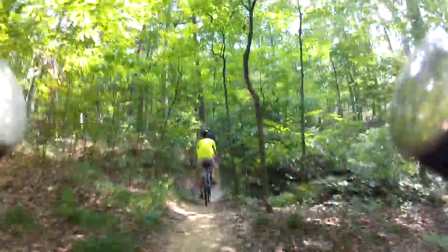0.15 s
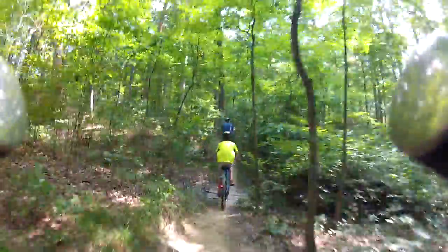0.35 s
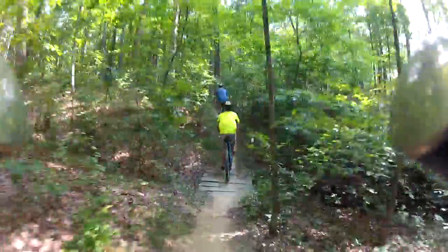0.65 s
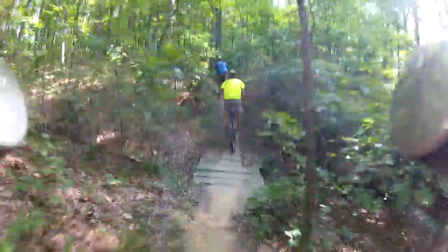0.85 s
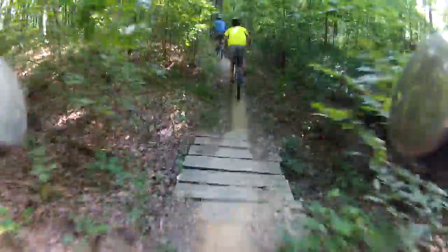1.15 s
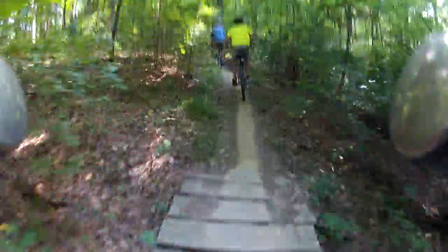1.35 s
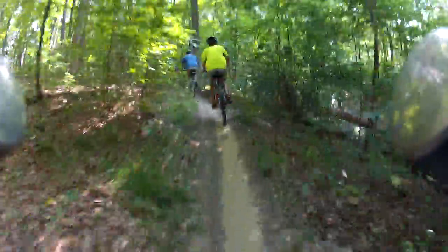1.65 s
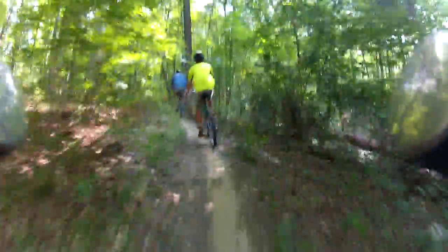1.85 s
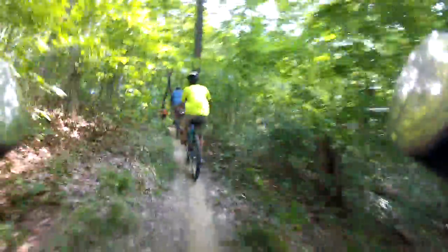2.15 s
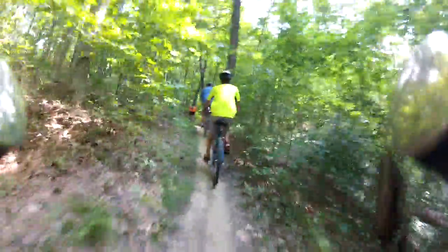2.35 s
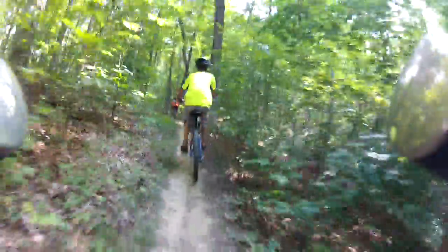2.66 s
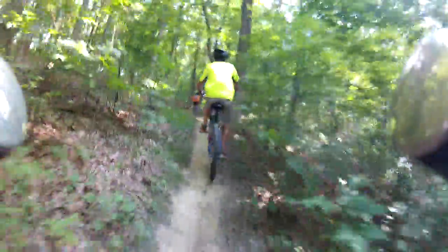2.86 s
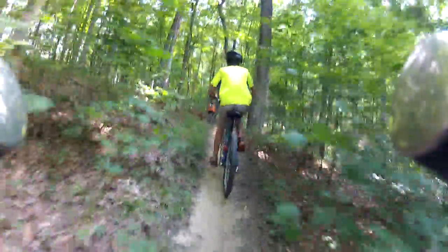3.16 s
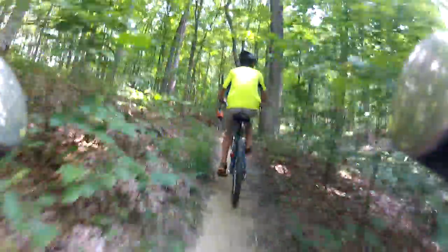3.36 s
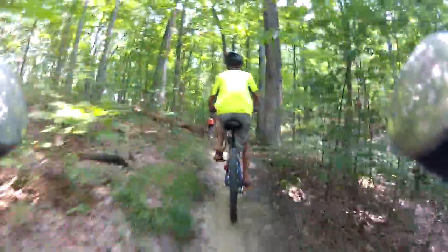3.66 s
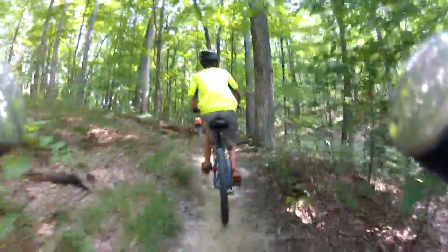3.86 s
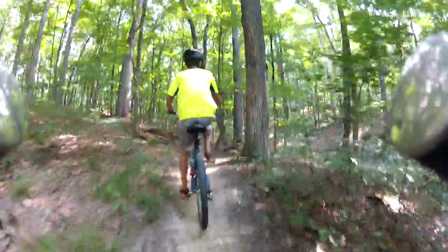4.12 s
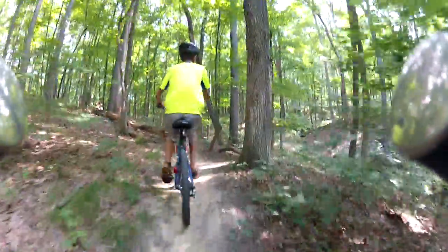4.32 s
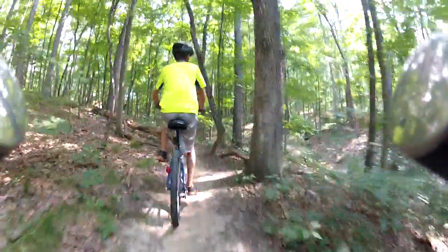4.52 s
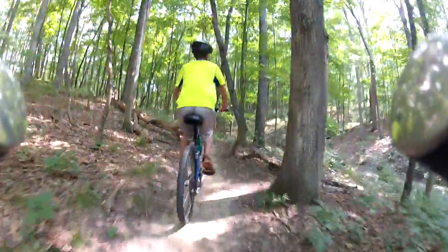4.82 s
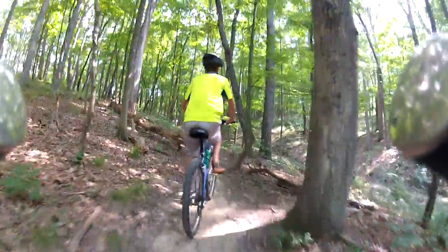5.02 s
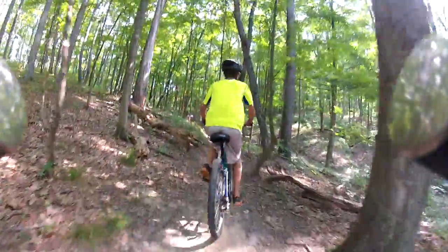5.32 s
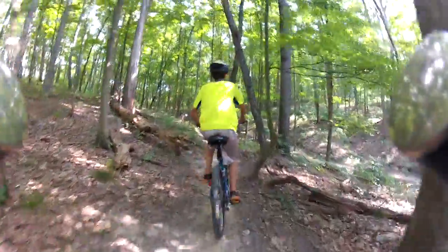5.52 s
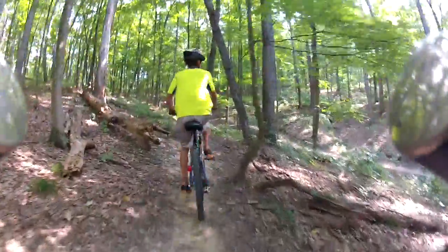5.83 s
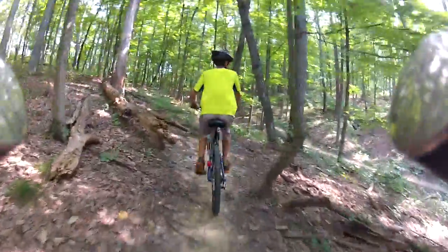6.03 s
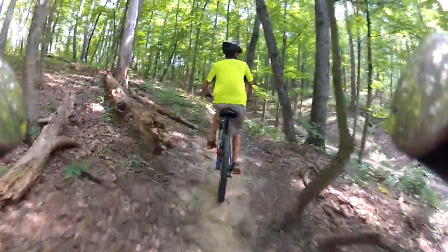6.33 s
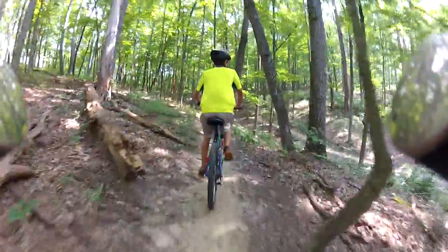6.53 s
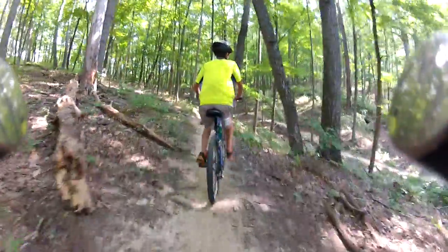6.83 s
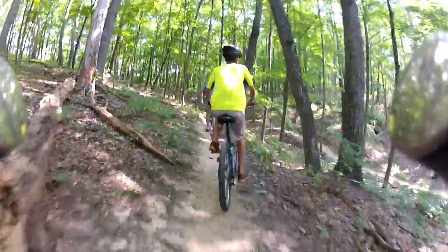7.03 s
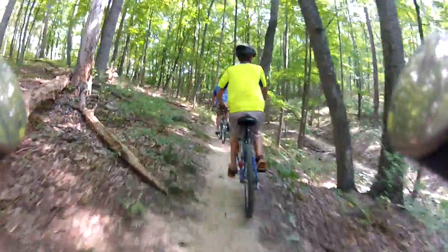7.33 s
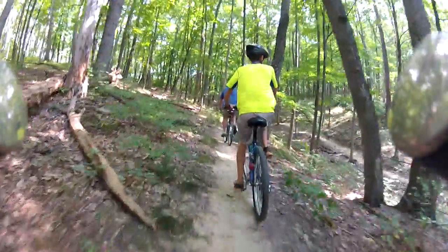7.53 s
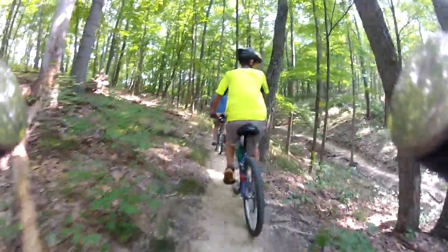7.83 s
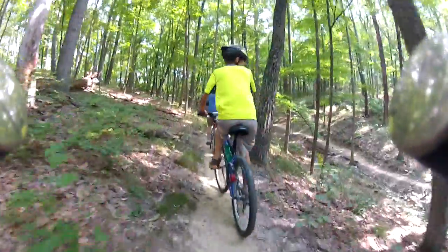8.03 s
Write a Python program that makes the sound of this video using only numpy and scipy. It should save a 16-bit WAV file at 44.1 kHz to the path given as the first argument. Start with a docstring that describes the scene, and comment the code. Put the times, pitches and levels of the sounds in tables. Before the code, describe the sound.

Heard close through a camera's plastic case, a mountain bike rattles along a woodland dirt track. A boxy, hollow resonance runs throughout with low humming, rumbling tyres and a buzz of loose parts. After a short run of freewheel ticks come the hardest knocks, with frame clacks and crunching grit. Roots and stones keep knocking as the rumble eases, metal chirps now and then, and the highs have a faint glassy sheen.

```python
"""A mountain bike rolls along a dirt trail, heard from a cased camera that rides on it.
The mount swings at a low pitch and drives loose parts to buzz in time with it. The tyres rumble
and crush grit; bumps excite the hollow resonance of the case and the clattering modes of the frame.
Early on the freewheel ticks, and now and then metal chirps. The camera's limiter ducks after
the hardest knocks, and its coarse sampling adds spectral images, heard as a glassy sheen."""
import sys
import numpy as np
from scipy import signal
from scipy.fft import rfft, irfft
from scipy.io import wavfile
from scipy.ndimage import uniform_filter1d, minimum_filter1d

SR = 44100
rng = np.random.default_rng(int(sys.argv[2]) if len(sys.argv) > 2 else 0)


def wav_record(signal):
    """Record a signal, one row per channel, as 16-bit PCM in the file named by sys.argv[1]."""
    frames = np.transpose(np.atleast_2d(signal))
    bounded = np.clip(frames, -1, 1)
    # unit amplitude maps onto the largest positive 16-bit level
    quanta = np.round(bounded * 32767).astype(np.int16)
    wavfile.write(sys.argv[1], SR, quanta)


N = 360738
TIME = np.arange(N) / SR


def from_db(db):
    """Amplitude ratio of a level in decibels."""
    return 10 ** (np.asarray(db) / 20)


def rms_one(x):
    """Normalisation to unit power."""
    return x / np.sqrt(np.mean(x ** 2) + 1e-20)


def evened(x, size):
    """Normalisation to unit power over a moving window of `size` samples; faster detail stays."""
    power = np.maximum(uniform_filter1d(x ** 2, size), 0)
    return x / np.sqrt(power + 1e-4 * np.mean(x ** 2))


def curve(rows):
    """Linear interpolation of (time, value) rows at every sample."""
    return np.interp(TIME, *np.transpose(rows))


def drift(rate):
    """Random modulation of unit power, with `rate` new values a second."""
    return rms_one(np.interp(TIME * rate, np.arange(20000), rng.standard_normal(20000)))


def impulses(seconds, heights):
    """Ideal impacts, one sample long, at the given times."""
    out = np.zeros(N)
    np.add.at(out, np.clip(np.round(np.asarray(seconds) * SR).astype(int), 0, N - 1), heights)
    return out


def grains(per_s, spread_db):
    """A Poisson process: independent contacts of random sign and strength."""
    contacts = (rng.random(N) < per_s / SR) * rng.choice([-1, 1], N)
    return contacts * from_db(spread_db * np.clip(rng.standard_normal(N), -2, 2))


def resonate(x, hz, width_hz):
    """A damped oscillator with unit gain at resonance."""
    r = np.exp(-np.pi * width_hz / SR)
    feedback = [1, -2 * r * np.cos(2 * np.pi * hz / SR), r * r]
    return signal.lfilter(np.array([1, 0, -1]) * (1 - r * r) / 2, feedback, x + 1e-18)


def body(x, modes):
    """Modal superposition: resonances in parallel, with alternating signs."""
    return sum((-1) ** k * from_db(db) * resonate(x, hz, width)
               for k, (hz, width, db) in enumerate(modes))


def band(x, low_hz, high_hz, order):
    """Maximally flat band-pass filter."""
    sos = signal.butter(order, [low_hz, high_hz], "band", fs=SR, output="sos")
    return signal.sosfilt(sos, x + 1e-18)


def bursts(events, rise_s, colour):
    """Dense contacts merge into noise: each (time, level) event swells in `rise_s` and decays."""
    s, db = np.transpose(events)
    age = np.arange(4000) / SR / rise_s
    swell = signal.oaconvolve(impulses(s, from_db(db)), (age * np.exp(1 - age)) ** 2)[:N]
    return swell * evened(colour(rng.standard_normal(N)), size=int(3 * rise_s * SR) + 1)


# strength of the mount's swing: (time [s], level [dB])
SWING_LEVEL = [(0.0, -21), (0.75, -27.5), (1.0, -19.5), (1.45, -27.5), (1.9, -20.5), (2.0, -33),
               (2.14, -23), (2.29, -32.5), (3.24, -22.5), (3.79, -31), (3.99, -22), (4.34, -26.5),
               (4.74, -21), (5.54, -33), (5.69, -16.5), (5.84, -34.5), (6.48, -32.6), (6.58, -29.5),
               (7.53, -24), (7.68, -37), (7.98, -21), (8.18, -32)]
# pitch of that swing: (time [s], frequency [Hz])
SWING_PITCH = [(0.0, 53.03), (0.8, 57.42), (0.89, 51.56), (1.41, 60), (1.57, 52.94), (2.41, 54),
               (2.57, 59.9), (2.96, 53.56), (3.89, 50), (4.12, 54.5), (5.49, 53.76), (5.92, 60.56),
               (6.58, 51.6), (8.18, 57.2)]
def mount_wobble():
    """Anharmonic oscillation of the jolted mount; gives sound, phase and dB above the mean swing."""
    swing_db = curve(SWING_LEVEL)
    phase = 2 * np.pi * np.cumsum(curve(SWING_PITCH) + 0.5 * drift(rate=19)) / SR
    jolts = evened(1 + 0.51 * np.minimum(drift(rate=17), 0.7), size=13000)   # feed or nearly stop it
    lopsided = np.sin(phase) + from_db(-22.5) * np.sin(2 * phase) + from_db(-25) * np.sin(3 * phase)
    swing = np.sqrt(2) * from_db(swing_db + 2.5) * jolts * lopsided
    return swing, phase, swing_db - swing_db.mean()


# spectrum of the tyre rumble: (frequency [Hz], relative spectral density [dB])
RUMBLE_SPECTRUM = [(18, 20), (30, 7), (42, 6), (70, 8.5), (95, 0), (116, 4), (142, -0.5), (172, 0.5),
                   (210, -7), (270, -8), (450, -5.5), (1500, -89)]
# strength of the rumble: (time [s], level [dB])
RUMBLE_LEVEL = [(0.0, -31), (1.95, -29.5), (2.09, -36), (3.29, -32), (3.69, -36), (6.38, -39),
                (6.58, -35.5), (8.18, -36)]
def tyre_rumble():
    """Random excitation: tyres rolling on packed dirt radiate lumpy low-frequency noise."""
    hz, db = np.transpose(RUMBLE_SPECTRUM)
    bin_hz = np.arange(N // 2 + 1) * SR / N
    colour = from_db(np.interp(np.log(bin_hz + 1), np.log(hz), db))
    noise = irfft(rfft(rng.standard_normal(N)) * colour, N)
    return from_db(curve(RUMBLE_LEVEL) + 6) * evened(band(noise, 28.7, 1400, order=2), size=11000)


# roughness of the ground, as the noise it stirs up: (time [s], level [dB])
GROUND_ROUGHNESS = [(0.0, -28.5), (1.1, -42), (1.55, -24.5), (1.9, -33.5), (2.0, -28.5), (2.24, -38.5),
                    (2.79, -32), (2.94, -34), (3.59, -29), (3.74, -38.5), (4.59, -39.5), (4.74, -35.5),
                    (5.89, -44), (6.09, -36.5), (6.28, -39.5), (6.43, -43), (7.63, -37.5), (8.18, -41.5)]
def roughness():
    """Surface roughness sets the excitation: dB above its mean, varying from lump to lump."""
    ground_db = curve(GROUND_ROUGHNESS)
    return ground_db - ground_db.mean() + 3 * np.clip(drift(rate=60), -2, 2)


# hollow resonances of the case: (frequency [Hz], bandwidth [Hz])
CASE_MODES = [(606, 38.4), (668, 47.6)]
def case(x, damping):
    """Resonators in series: one drives the other, and damping widens both."""
    for hz, width in CASE_MODES:
        x = resonate(x, hz, width * damping)
    return x


# modes of frame and bars: (frequency [Hz], bandwidth [Hz], gain [dB])
FRAME_MODES = [(308.6, 35.6, 4), (392, 29.7, 6.5), (452, 120, -1.5), (687.4, 26.4, 5), (945, 91, -2.5),
               (1021, 41, -1), (1110, 68, 2.5)]
def frame(x):
    """Modal response of frame and bars, a dull clatter."""
    return band(body(x, FRAME_MODES), 345.6, 1054, order=5)


# strength of the case's hollow ring: (time [s], level [dB])
RING_LEVEL = [(0.0, -19.5), (1.15, -22), (1.4, -14.5), (1.5, -18), (1.95, -16), (2.29, -18), (2.59, -17.5),
              (5.34, -18.5), (5.49, -17), (5.69, -22.8), (5.84, -17.5), (8.18, -17.5)]
def trail_bumps(rough_db):
    """Forced vibration: countless small bumps keep the case and the frame ringing."""
    hollow = evened(case(grains(per_s=420, spread_db=2), damping=1), size=1800)
    hollow *= from_db(curve(RING_LEVEL) + 2.2 * drift(rate=14) + 0.15 * rough_db - 0.7)
    bumps = grains(per_s=600, spread_db=4.5) * from_db(1.2 * np.tanh(drift(rate=45)))
    clatter = from_db(-31 + 0.74 * rough_db) * evened(frame(bumps), size=4400)
    return tyre_contact() * (hollow + clatter)


# modes of the loose plastic parts: (frequency [Hz], bandwidth [Hz], gain [dB])
PLASTIC_MODES = [(2450, 800, -6), (3320, 840, 0.5), (3910, 770, -0.5), (5350, 180, -2)]
def plastic(x):
    """Heavily damped high modes give hard plastic a short, bright ring."""
    return band(body(x, PLASTIC_MODES), 750, 7500, order=2)


# hardest snaps of the loose parts: (time [s], level [dB])
PLASTIC_SNAPS = [(0.079, -19.5), (0.138, -15), (0.201, -18.5), (0.592, -17), (0.838, -15.5), (0.997, -21),
                 (1.362, -21), (1.57, -10), (1.608, -14), (1.645, -18.5), (2.589, -18.5), (2.875, -22),
                 (3.398, -20.5), (4.169, -31), (4.725, -19), (4.745, -20), (4.852, -18), (5.956, -23),
                 (6.902, -23), (7.06, -22), (7.319, -21.5)]
def rattle(phase, swing_db, rough_db, jitter_s=0.0014, spread_db=8, lead_db=5.5):
    """Impact oscillation: loose parts hit their stops twice per swing, harder on one side."""
    turns = TIME[1:][np.diff(np.floor(phase / np.pi)) > 0]
    timing, force = rng.standard_normal((1200, 2))[:len(turns)].T
    force_db = spread_db * np.tanh(force) + lead_db * (np.arange(len(turns)) % 2)
    hits = bursts(np.column_stack([turns + jitter_s * timing, force_db]), rise_s=0.0012, colour=plastic)
    # between the stops the parts shuffle about in flurries
    flurries = grains(per_s=1100, spread_db=5.5) * from_db(8.6 * np.tanh(drift(rate=60)))
    shuffle = from_db(-2.5) * rms_one(plastic(flurries))
    level_db = -35.5 + 0.25 * rough_db + 0.55 * swing_db + 2.1 * drift(rate=16)
    snaps = bursts(PLASTIC_SNAPS, rise_s=0.0021, colour=plastic)
    return from_db(level_db) * evened(hits + shuffle, size=4000) + snaps


# resonances excited by grit: (frequency [Hz], bandwidth [Hz], gain [dB])
GRIT_MODES = [(1297, 148, -2.5), (1803, 77, 2.5), (2014, 124, 1.5), (2370, 105, 8), (2446, 286, 1),
              (2740, 83, 6.5), (3113, 114, -3.5), (3820, 250, -3.5)]
def dirt(x):
    """Modal response of the tread on gritty ground."""
    return band(body(x, GRIT_MODES), 1220, 4500, order=3)


# the tread crushes a patch of grit: (time [s], level [dB])
GRIT_CRUNCHES = [(0.16, -25), (1.567, -27), (1.585, -22.5), (1.612, -34), (1.79, -21.5), (1.906, -25.5),
                 (1.985, -24), (2.043, -23), (2.564, -24), (2.678, -22), (3.442, -25.5), (3.607, -35),
                 (4.739, -28), (6.025, -37), (7.959, -28)]
def grit(rough_db, scuff_at_s=6.62, scuff_half_s=0.085):
    """Shot noise: grains crunch in clumps, louder on rough ground and as a tyre scuffs sideways."""
    clumps = from_db(4.6 * np.tanh(drift(rate=90)))
    crunch = evened(dirt(grains(per_s=2500, spread_db=10) * clumps), size=3000)
    scuff_db = 9 * np.exp(-((TIME - scuff_at_s) / scuff_half_s) ** 2)
    level_db = -37 + 0.55 * rough_db + scuff_db + 2 * drift(rate=18)
    patches = bursts(GRIT_CRUNCHES, rise_s=0.0049, colour=dirt)
    return from_db(level_db) * crunch + from_db(2.5) * patches


def small_stones(rough_db, per_s=5):
    """Random arrivals of stones; gives knock times for the case and (time, level) rows for the frame."""
    chance = rng.random((200, 3))
    arrivals = np.cumsum(0.3 + 1.4 * chance[:, :2], axis=0) / per_s
    knock_s, clack_s = (s[s < TIME[-1]] for s in arrivals.T)
    clack_db = -21 + 0.5 * np.interp(clack_s, TIME, rough_db) - 3 * chance[:len(clack_s), 2]
    return knock_s, np.column_stack([clack_s, clack_db])


# big roots, stones and bridge planks knock the case: (time [s], level [dB])
BIG_BUMPS = [(0.026, -6), (0.214, -2.5), (0.848, -6.5), (0.88, -6), (1.353, -3), (1.406, 9), (1.74, -5.5),
             (2.14, 6), (2.485, -6), (2.64, -5.5), (2.827, -6.5), (3.688, -10.5), (3.739, -4),
             (4.046, -7.5), (4.097, -14), (4.205, 1), (4.447, -8.5), (4.514, -2), (4.698, -7), (4.937, -5),
             (5.064, -7), (5.209, -4), (5.38, -9), (5.519, -9), (5.808, -6), (5.912, -6.5), (6.003, -10),
             (6.159, -11), (6.283, -4.5), (6.706, -1), (6.907, -5), (7.679, -9.5), (7.704, -6.5),
             (7.834, -6.0), (8.007, -7.5)]
def case_knocks(stone_s):
    """Impulse response: each big bump or small stone draws a brief, damped knock from the case."""
    s, db = np.transpose(BIG_BUMPS)
    blows = impulses(s - 0.001, from_db(db - 0.3)) + impulses(stone_s, from_db(-11))
    ring = band(case(signal.unit_impulse(6000), damping=1.7), 470, 860, order=2)
    return signal.oaconvolve(blows, ring / np.abs(ring).max())[:N]


def tyre_contact(skip_share=0.26, skip_s=0.0063):
    """Partial loss of contact: on a big bump the tyre skips some of the small ones."""
    bump_s = np.transpose(BIG_BUMPS)[0]
    nearest_s = np.abs(TIME[::20, None] - bump_s).min(axis=1)
    return 1 - skip_share * np.exp(-(np.interp(TIME, TIME[::20], nearest_s) / skip_s) ** 2)


def hard_contact(x):
    """A hard contact excites the upper modes of the frame, with a bright, gritty edge."""
    return rms_one(band(frame(x), 667, 1085, order=2)) + from_db(-11) * rms_one(dirt(x))


# hard blows to the frame: (time [s], level [dB])
FRAME_BLOWS = [(0.22, -18), (0.575, -16), (1.351, -13.5), (1.403, -12), (1.615, -12), (1.739, -10),
               (1.79, -14), (1.86, -13.5), (1.908, -14), (1.966, -14), (1.985, -14), (2.786, -17),
               (3.312, -13), (3.609, -14.5), (4.877, -25), (4.903, -18), (4.93, -17), (5.178, -15.5),
               (6.453, -17.5), (6.482, -22), (7.289, -17.5), (7.323, -17), (7.533, -17.5), (7.641, -18),
               (7.672, -18.5)]
def frame_clacks(stone_blows):
    """Transient excitation: roots and stones make the frame clack, higher than the case."""
    blows = np.vstack([FRAME_BLOWS, stone_blows])
    return from_db(0.45) * bursts(blows, rise_s=0.0041, colour=hard_contact)


def metal_tones(events, rise_s, sag_hz):
    """Damped vibration: touched metal swells and fades, sagging `sag_hz` in each of three rise times."""
    out = np.zeros(N)
    age = np.arange(3000) / SR / rise_s
    swell = (age * np.exp(1 - age)) ** 2
    for s, db, hz in events:
        pitch = hz + sag_hz * (1 - np.minimum(age, 3))
        tone = from_db(db) * swell * np.sin(2 * np.pi * np.cumsum(pitch) / SR)
        start = max(int(s * SR), 0)
        out[start:start + len(age)] += tone[:N - start]
    return out


def freewheel(coast_s=(0.362, 1.29), ticks_per_s=(42.6, 38.2), level_db=-26.5, ring_hz=2830):
    """Nearly periodic impacts: pawls drop at a slowing pace, each with a slightly different ring."""
    rate = np.interp(TIME, coast_s, ticks_per_s, left=0, right=0)
    tick_s = TIME[1:][np.diff(np.ceil(np.cumsum(rate) / SR)) > 0]
    ticks = np.array([(s, level_db, ring_hz) for s in tick_s])
    scatter = rng.standard_normal(ticks.shape) * [0.001, 2, 70]   # s, dB, Hz
    return metal_tones(ticks + scatter, rise_s=0.0036, sag_hz=45)


# touches of metal on the bike: (time [s], level [dB], frequency [Hz])
METAL_TOUCHES = [(1.5671, -10.5, 2730), (2.8569, -13, 2800), (2.8766, -13, 2790), (4.4752, -13.5, 2720),
                 (6.005, -10.5, 2777)]
def metal_chirps():
    """Free vibration of a single mode: each touch of metal gives a short falling chirp."""
    return from_db(-10.5) * metal_tones(METAL_TOUCHES, rise_s=0.0062, sag_hz=22)


def scene():
    """Superposition: every source reaches one microphone through the mount and the case."""
    rough_db = roughness()
    swing, phase, swing_db = mount_wobble()
    rolling = swing + tyre_rumble() + trail_bumps(rough_db)
    stone_s, stone_blows = small_stones(rough_db)
    impacts = case_knocks(stone_s) + frame_clacks(stone_blows)
    metal = freewheel() + metal_chirps()
    mix = rolling + impacts + metal + rattle(phase, swing_db, rough_db) + grit(rough_db)
    return np.tile(mix, (2, 1))


def limiter(x, limit_db=-3, attack_s=0.00094, hold_s=0.066, release_db_per_s=103):
    """Automatic gain control: a peak over the limit cuts the gain, which holds, then climbs back."""
    over_db = np.maximum(20 * np.log10(np.abs(x).max(axis=0) + 1e-9) - limit_db, 0)
    half_hold = int(hold_s * SR) // 2
    held_db = -minimum_filter1d(-over_db, 2 * half_hold + 1, origin=half_hold, mode="constant")
    release_db = release_db_per_s * TIME
    duck_db = np.maximum.accumulate(held_db + release_db) - release_db
    pole = np.exp(-1 / (attack_s * SR))
    return x * from_db(-signal.lfilter([1 - pole], [1, -pole], duck_db))


def sample_and_hold(x, sampling_hz=12000):
    """Spectral imaging: holding each coarse sample mirrors the sound faintly about the sampling rate."""
    band_limited = signal.sosfilt(signal.butter(10, 5850, fs=SR, output="sos"), x)
    mirrored = band_limited * (1 + 2 * np.cos(2 * np.pi * sampling_hz * TIME))
    hz = np.arange(N // 2 + 1) * SR / N
    hold_droop = np.sinc(hz / sampling_hz) / np.sinc(hz / (4 * sampling_hz))
    return irfft(rfft(mirrored) * hold_droop, N)


def record(dry):
    """The camera's signal chain: limiting, coarse sampling, full-scale clipping and a steep low-pass."""
    clipped = np.clip(sample_and_hold(limiter(dry)), -1, 1)
    return signal.sosfilt(signal.ellip(10, 0.1, 80, 15600, fs=SR, output="sos"), clipped)


dry = scene()
out = record(dry)
wav_record(out)
```